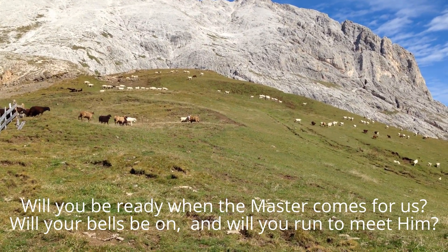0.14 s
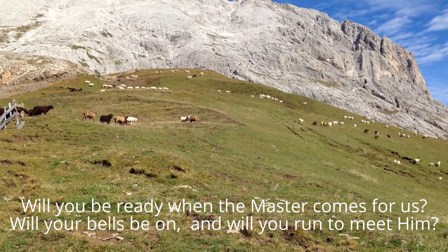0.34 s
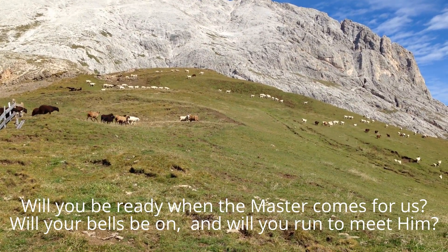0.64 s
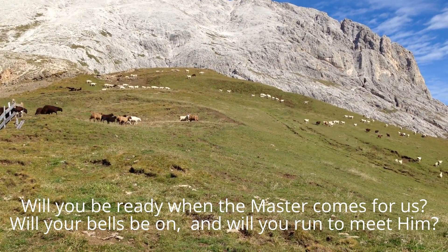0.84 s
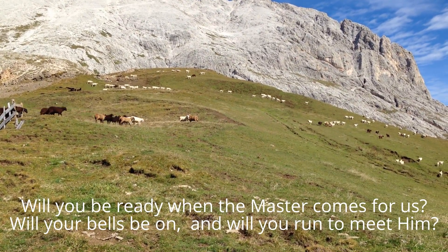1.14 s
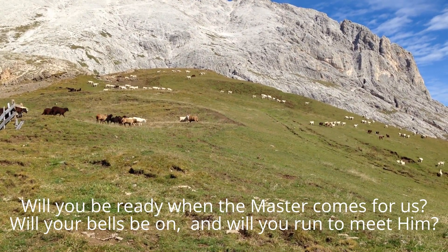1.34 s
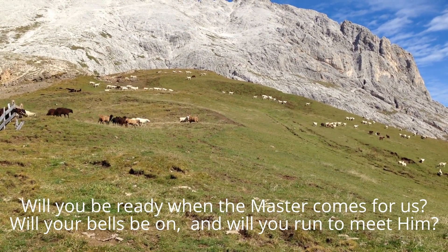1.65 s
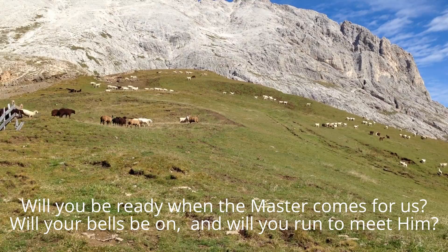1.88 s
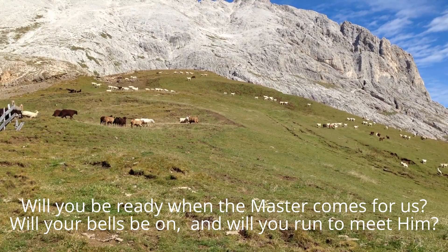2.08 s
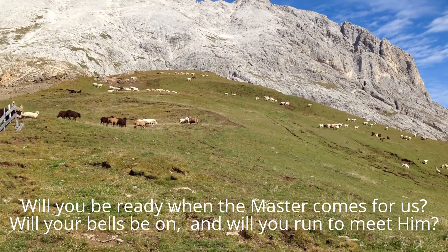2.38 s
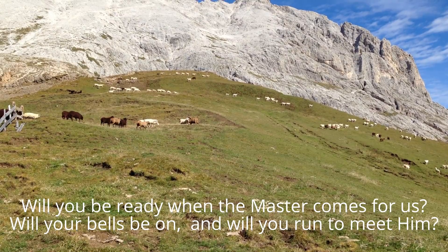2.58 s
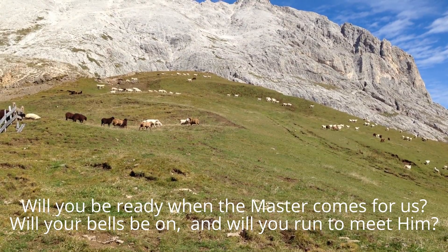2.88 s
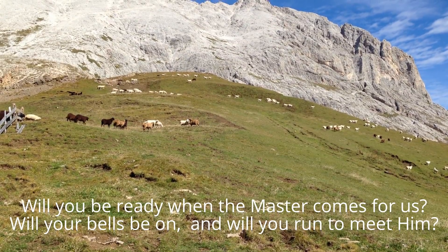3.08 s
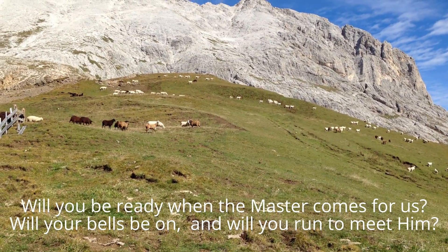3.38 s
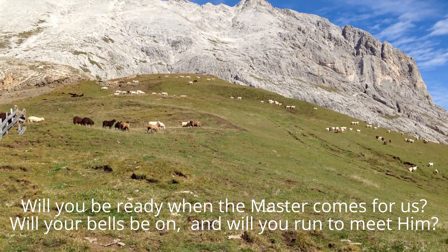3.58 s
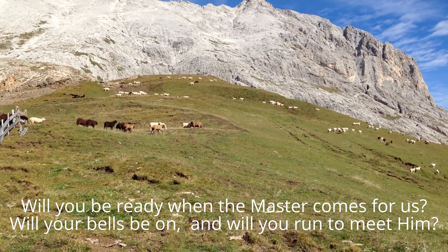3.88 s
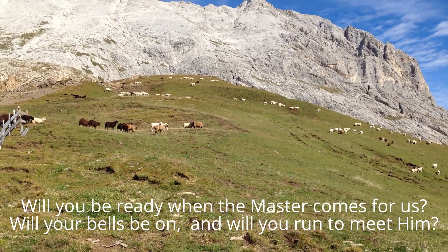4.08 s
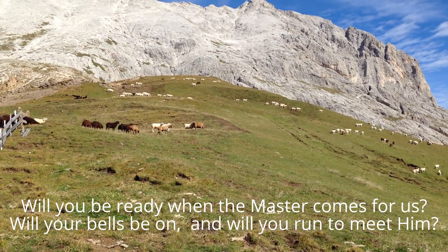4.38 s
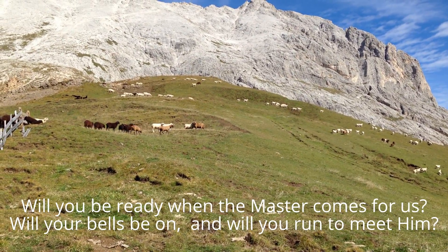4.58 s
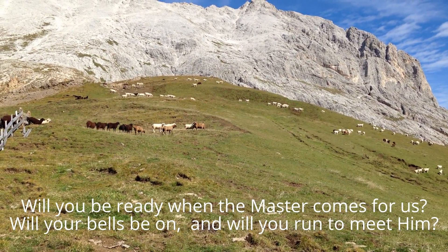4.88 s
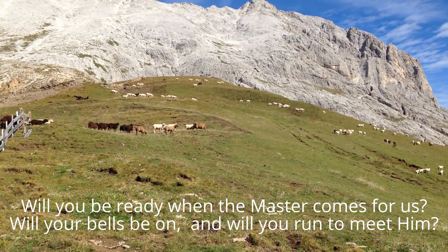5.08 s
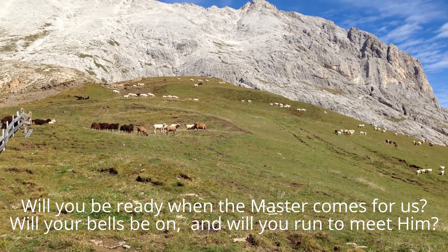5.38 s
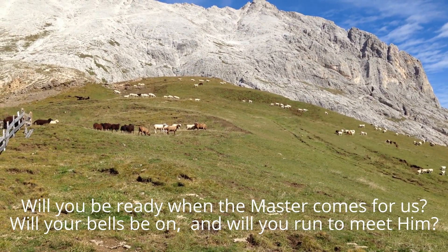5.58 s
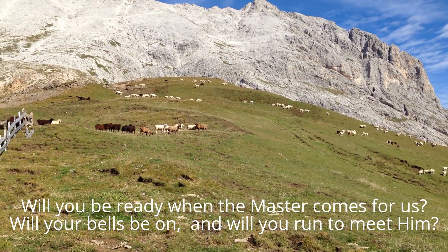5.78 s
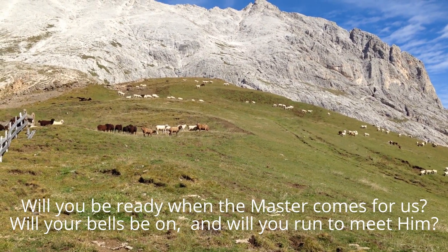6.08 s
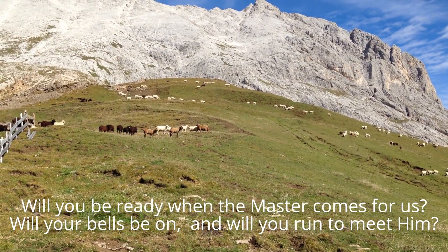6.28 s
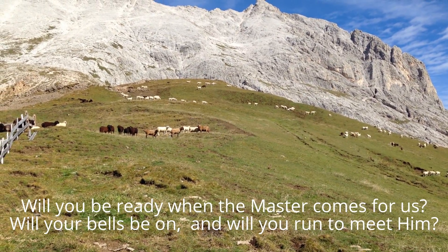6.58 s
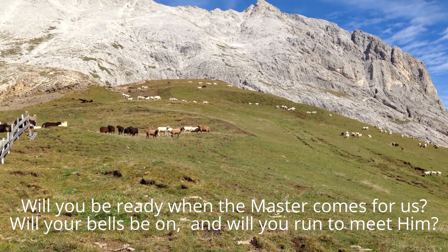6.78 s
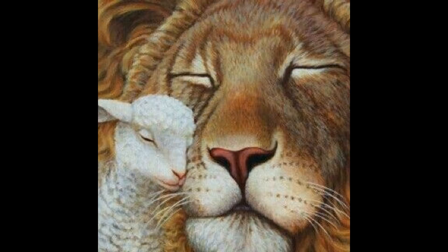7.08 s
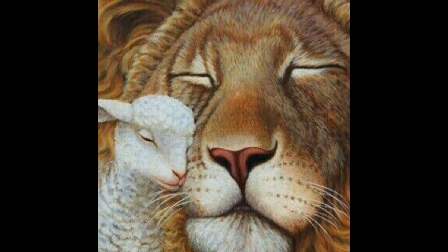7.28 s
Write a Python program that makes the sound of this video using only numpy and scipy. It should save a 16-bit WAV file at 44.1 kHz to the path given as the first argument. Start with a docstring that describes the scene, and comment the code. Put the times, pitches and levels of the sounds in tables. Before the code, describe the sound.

Irregular bell clanks come thick and busy at first, then sparser, with bright ticks from the clappers and a thin sustained bronze shimmer. Distant bells dot the open, echo-free hillside. After a calm start, wind thuds and flutters low against the single microphone, strongest past four seconds. Brief grassy rustles and a barely audible bleat pass over steady hiss; the ending is sudden.

```python
"""Grazing flock on a windy pasture

Neck bells on a mountain pasture: close by, a bronze bell that rings long and three tin bells that clank, each a set
of decaying modes given new levels by blows and soft changes; dying tones and dull clanks stand for bells further off.
Wind buffets the microphone as lumpy low noise with short pops, something near rustles in bursts of mid noise,
dry ticks are specks of noise, and one far animal bleats faintly in harmonics over a steady hiss.
The sound stops short just before seven seconds."""
import sys
import numpy as np
from scipy import signal
from scipy.fft import rfft, irfft
from scipy.io import wavfile
from scipy.ndimage import uniform_filter1d

SR = 44100
rng = np.random.default_rng(int(sys.argv[2]) if len(sys.argv) > 2 else 0)


def unload_audio(sound):
    """Save the sound as a 16-bit wav file, at the path given as the first command line argument."""
    columns = np.transpose(np.atleast_2d(sound))
    # keep every value between -1 and 1, then stretch to whole-number steps
    steps = np.round(np.clip(columns, -1, 1) * 32767)
    wavfile.write(sys.argv[1], SR, steps.astype(np.int16))


N = 328545
T = np.arange(N) / SR
END_S, BAND_LIMIT_HZ = 6.9587, 15450

# Modes of the four near bells, in families that a blow excites together, lowest family first.
# Each row: frequency in Hz, level in dB within the family, time to fall 60 dB in seconds.
BRONZE_MODES = [
    [(1828, 0, 2.5)],
    [(1853, 0, 2.5)],
    [(4553, 0, 1.1)],
    [(7344, 0, .6), (7356, -12, .5)],
    [(7885, -2, .3), (7838, -6, .25), (8870, -4, .45), (10824, -2, .3), (13722, -12, .15), (15030, -5, .15)],
]
TIN_LOW_MODES = [
    [(1041, 0, .27), (1060, -11, .12), (1019, -15, .14), (905, -20, .15)],
    [(2593, -1, .6), (2550, -11, .25), (2625, -14, .25)],
    [(3552, 0, .8)],
    [(3942, 0, .9), (1902, -6, 1.1)],
    [(5078, -4, .3), (5313, -3, .25), (5590, -7, .2), (6470, -11, .1), (6870, -10, .12), (7550, -12, .1),
     (8205, -10, .12), (8780, -9, .15), (9400, -13, .1), (10110, -11, .12), (12090, -13, .1)],
]
TIN_MID_MODES = [
    [(1122, -1, .11), (1165, -12, .1), (1075, -13, .08)],
    [(2795, 0, .65)],
    [(2201, 0, 1.2)],
    [(4047, 0, .9)],
    [(5862, -5, .12), (6358, -2, .08), (6150, -7, .08), (8060, -9, .1), (8672, -9, .1)],
]
TIN_HIGH_MODES = [
    [(1207, 0, .12)],
    [(3582, 0, .15)],
]

# Blows on the bronze bell and, between them, soft changes in the level of its ring.
# Each row: start in seconds, strength in dB, ring and treble in dB (shared out by the family law),
# hum in dB, direction from 0 to 1 across the hum pair (the two lowest modes).
BRONZE_BLOWS = [(.004, -54, -10, -7, -64.5, 0.04), (.099, -51, -12, -12.5, -66.5, 0),
                (.229, -50.5, -12, -16.5, -68, 0), (.502, -46.5, -17.5, -8.5, -82.5, 1),
                (.569, -44.5, -8, -19.5, -72, 0.85), (.699, -52.5, -4.5, -14, -69.5, 0.4),
                (.849, -54, -4.5, -14, -70.5, 0.2), (1.099, -54, -11, -28, -70, 0.6),
                (1.253, -56.5, -4.5, -5, -71, 1), (1.329, -54.5, -6, -14, -71.5, 0.9),
                (1.623, -59, -1.5, -3, -76, 0.2), (1.756, -58.5, 1, -20.5, -77, .8),
                (2.2036, -40, -9, -16, -77.5, 0.8), (2.452, -73, 1, 14.5, -94, 0.5),
                (3.058, -55, -12, -10, -75, .6), (3.169, -48, -23, -22, -64.5, .95),
                (3.349, -58.5, -12, -14, -66.5, 0.93), (3.499, -57.5, -29, -40, -68, 0.15),
                (3.959, -64.5, -10, -4, -70, 1), (4.106, -58.5, 4, -5.5, -64.5, 1),
                (4.319, -58, -4, -5.5, -64.5, 0.7), (4.349, -52, -19, -22, -60.5, 0.2),
                (4.601, -53.5, -15, -30, -62, 0.35), (4.779, -58, -21, -27, -64, .55),
                (5.082, -47, -5.5, -12, -67.5, 0.6), (5.322, -60.5, 2.5, -21, -69.5, 0.4),
                (5.433, -67, 10, 6.5, -60.5, 0.83), (5.748, -66.5, -21, -21.5, -62, 0.2),
                (6.298, -55, -7, -28, -68.5, 0.6), (6.449, -58.5, -20.5, -26.5, -72.5, 0.9),
                (6.599, -56, -6.5, -15, -78.5, .2)]
# Blows on the low tin bell. Each row: start in seconds, strength in dB, ring, upper ring and treble in dB
# (shared out by the family law), factor on the ring time of the lowest family, which the wool damps.
TIN_LOW_BLOWS = [(0.0034, -44.5, -9, -29, -15, 0.45), (0.082, -55.5, -2, -16, -9, 0.47),
                 (0.1563, -45, -0.5, -35, -13, 1), (0.1844, -53, -7, -20, -2, 0.87),
                 (0.2229, -49.5, -13, -25.5, -13.5, 0.52), (0.2534, -56, 7, -32.5, -24.5, 0.42),
                 (0.2673, -38.5, -19.5, -31, -17.5, 0.42), (0.3945, -53, -30, -18, -17, 0.74),
                 (0.5084, -53, -0.5, -18, -11.5, 1), (0.5984, -62, -14, -24.5, -5, 1),
                 (0.6689, -64, -7, -17.5, 9, 0.97), (0.711, -47, -13, -35, -12, 1),
                 (0.7405, -33.5, -31, -43, -45, 0.43), (0.7926, -53.5, -14, -23, -6, 1),
                 (0.8325, -40, -6.5, -18, -24.5, 1), (0.8644, -40.5, -11, -41, -13.5, 0.67),
                 (0.9144, -77, -6, 7, 14, 0.55), (0.9443, -52, -11, -31, -13, 0.98),
                 (1.1495, -43.5, -22, -12.5, -17.5, 0.66), (1.4643, -47, 5, -22, -19, 0.57),
                 (1.5194, -58, -20, -11.5, 4.5, 0.98), (1.7472, -43, -12, -30, -18, 0.62),
                 (1.8666, -45, -12, -36, -21.5, 0.87), (2.3171, -45.5, -8.5, -61, -10, 0.49),
                 (2.518, -46.5, -30, -37, -30, 0.29), (2.6314, -59.5, -12, -14, -20, 0.6),
                 (3.0458, -57.5, -6, -5, -14, 0.57), (3.1577, -65, -13, -10, -13, 0.7),
                 (3.533, -48, -8, -20.5, -31, 0.96), (3.8162, -63, -1, -8, -19, 1),
                 (4.0347, -60, -0.5, -21, -12, 1), (4.2218, -55.5, -22.5, -1.5, -20, 0.27),
                 (4.907, -40.5, -26, -39, -27, 0.35), (5.6291, -63, -15, -27, -13, 0.75),
                 (5.6885, -58, -23, -21, -15, 0.25), (5.8696, -58.5, -11, -18, -15, 0.44),
                 (5.9244, -47.5, -15, -17.5, -21, 1), (6.1175, -56.5, -3, -23.5, -14, 0.48),
                 (6.2924, -54.5, -7.5, -13, -24, 0.27), (6.4017, -52.5, -17.5, -27.5, -11, 0.63),
                 (6.4157, -38, -27.5, -29, -31, 0.55), (6.4298, -28, -16.5, -46, -32.5, 0.31),
                 (6.4985, -50, -5, -22, -29, 0.34), (6.586, -56, -10, -8.5, -10, 0.58),
                 (6.6213, -51, -23, -23, -21, 0.35), (6.8728, -52, -2.5, -0.5, -3.5, 0.62)]
# Blows on the middle tin bell. Each row: start in seconds, strength in dB, ring, upper ring and treble in dB.
TIN_MID_BLOWS = [(0.222, -54.5, -23, -8, -13), (1.0584, -70.5, -16, 15, 5), (1.43, -53, -7, -30.5, -5),
                 (1.479, -57, -18, 1, -3), (2.0674, -44.5, -21, -24.5, -26), (2.1605, -63.5, -6, -12, -15),
                 (2.2593, -59.5, -12.5, -7.5, -9), (2.3356, -64.5, -16, 2, -8), (2.499, -48, -20, -20, -27),
                 (2.6758, -64, -13.5, -8, -11), (2.8907, -52.5, -18.5, -12, -18),
                 (2.9991, -65.5, -17, -7, -16), (3.1445, -64, -15, -3, -1), (3.3094, -57.5, -18, -16, -11),
                 (3.515, -61.5, -9, -11, -1), (3.753, -61.5, -16, -3.5, -5.5), (4.0494, -82, -4, -10, -10),
                 (4.2158, -60, -26, -17.5, -12), (4.7384, -59, -19, -11, -17), (4.8838, -48, -25, -26, -13),
                 (4.928, -56.5, -30, 2.5, -7.5), (5.079, -45, -16, -19, -21),
                 (5.3053, -54.5, -9.5, -7, -6.5), (5.3874, -59, -24, -5, -11), (5.7514, -62, -9, -36, -9),
                 (5.921, -52.5, -21, -15.5, -24), (6.4133, -46, -29, -25.5, -29), (6.696, -67, -12, -3, 0)]
# Blows on the high tin bell. Each row: start in seconds, strength in dB, ring in dB.
TIN_HIGH_BLOWS = [(.1196, -66.5, 9), (0.4746, -52, 6), (1.7534, -56, -0.5), (3.0894, -70, 10),
                  (4.6478, -83, 16), (5.473, -73.5, 13.5)]

# How a blow feeds the families above the hum pair. Each row: dB over the strength, share of ring, of treble.
BRONZE_LAW = [(0, 0, 0), (0, 1, 0), (0, 0, 1)]
# The same for every family of the low and middle tin bells.
# Each row: dB over the strength, share of ring, of upper ring, of treble.
TIN_LOW_LAW = [(3.5, 0.045, 0.22, 0), (-1, 0.95, 0.13, 0.056), (-0.5, 0.28, 0.88, 0.078),
               (-6, 0.061, 0.58, 0.29), (-3, 0.028, 0.12, 0.92)]
TIN_MID_LAW = [(8, 0.25, 0, 0), (4, 0.75, 0.051, 0.21), (-1.5, .5, 0.33, 0.3), (-1, 0.16, 0.78, 0.015),
               (-2.5, 0.067, 0, 0.76)]
# The same for the high tin bell. Each row: dB over the strength, share of ring.
TIN_HIGH_LAW = [(0, 0), (0, 1)]

# Moments when the 4553 Hz tone of the bronze bell dips to silence, as close tones beating.
# Each row: time in seconds, half width in seconds.
BEAT_DIPS = [(.05, 0.0035), (.2, 0.021), (.56, 0.051), (1.06, 0.01), (1.28, 0.02), (1.54, 0.015),
             (3.3, 0.13), (4.57, 0.028), (4.76, 0.043), (6.62, 0.0085)]
# Spectrum of the glitter after a blow. Each row: frequency in Hz, density in dB per Hz.
GLITTER_SPECTRUM = [(3000, -42.5), (5000, -16), (7000, -2), (10000, -21), (14000, -22.5), (16000, -31.5)]
# Bells further off, of which one tone carries. Each row: start in seconds, starting rms in dB, pitch in Hz.
FAR_TONES = [(.56, -70, 1480), (.69, -64, 1500), (.71, -60, 8200), (1.08, -66, 1100), (1.31, -62.5, 830),
             (1.33, -69, 1500), (1.62, -61, 4939), (1.76, -59, 4850), (1.77, -63, 10110), (4.75, -69, 3050),
             (4.885, -52, 4470), (5.2, -58.5, 1040), (5.69, -65, 4850), (5.865, -67, 6100),
             (5.865, -65, 8800), (6.428, -55, 4200), (6.43, -60, 10100), (6.43, -62, 6150)]

# Wind between the pops, before its overall trim and its lumps. Each row: time in seconds, level in dB.
WIND_LEVEL = [(0, -69), (.3, -71), (.75, -70), (1.3, -70), (2.15, -65.5), (2.4, -57), (2.58, -64.5),
              (2.8, -44.5), (3.08, -58), (3.3, -51), (3.75, -47), (4.2, -49.5), (4.55, -46.5), (5.1, -44.5),
              (5.5, -48), (5.68, -44.5), (5.76, -64), (5.86, -44.5), (6.2, -44.5), (6.45, -44),
              (6.57, -51.5), (6.66, -46.5), (6.95, -34.5)]
# Spectrum of the buffeting. Each row: frequency in Hz, density in dB per Hz.
BUFFET_SPECTRUM = [(15, -75.5), (25, -46), (49, -30), (138, 4), (211, 1.5), (330, -12), (376, -12),
                   (468, -21.5), (723, -32), (800, -34), (1040, -74), (1760, -120)]
# Pops of wind on the microphone. Each row: crest in seconds, level in dB, centre in Hz.
WIND_POPS = [(.431, -46, 211), (0.455, -28.5, 260), (0.561, -53.5, 187), (0.688, -54, 168),
             (0.911, -55, 190), (1.158, -51, 176), (1.411, -56, 187), (1.55, -47, 190), (1.949, -50, 193),
             (2.242, -46, 192), (2.458, -46.5, 181), (2.632, -40.5, 193), (2.756, -36.5, 167),
             (2.779, -41.5, 176), (2.806, -26.5, 270), (2.84, -37.5, 240), (2.89, -32.5, 194),
             (2.961, -43.5, 190), (3.187, -34, 178), (3.246, -35.5, 196), (3.273, -38, 173),
             (3.429, -34, 182), (3.453, -51, 171), (3.584, -28.5, 190), (3.602, -28.5, 162),
             (3.859, -39.5, 171), (3.993, -32.5, 161), (4.135, -41, 196), (4.237, -39.5, 189),
             (4.304, -22.5, 203), (4.334, -14, 277), (4.361, -27.5, 265), (4.703, -31.5, 268),
             (4.723, -14.5, 217), (4.771, -27.5, 294), (4.792, -22.5, 270), (4.807, -26, 295),
             (4.823, -49, 222), (4.87, -29, 220), (4.927, -27.5, 330), (5.019, -32.5, 188),
             (5.139, -31, 258), (5.276, -45, 214), (5.334, -16.5, 241), (5.353, -27, 227),
             (5.448, -33, 258), (5.542, -25, 238), (5.589, -29.5, 197), (5.611, -34, 248),
             (5.697, -25, 151), (5.885, -37, 208), (5.931, -37, 203), (5.958, -59, 211), (5.974, -30, 216),
             (5.986, -22, 218), (6.007, -31.5, 177), (6.03, -28.5, 204), (6.057, -28.5, 170),
             (6.116, -50, 176), (6.287, -38.5, 200), (6.303, -37, 182), (6.35, -34.5, 162),
             (6.438, -39, 206), (6.493, -37.5, 235), (6.702, -38, 270), (6.733, -29, 234),
             (6.751, -22, 242), (6.858, -48, 174), (6.869, -32, 227), (6.897, -41, 217),
             (6.936, -28.5, 235)]

# Near rustles. Each row: start in seconds, level in dB, relative level of the treble part in dB, before trims.
RUSTLE_BURSTS = [(0.284, -48, -21.5), (.315, -37, -11.5), (.326, -38, -12.5), (0.348, -49, -26),
                 (1.424, -50.5, -11), (1.563, -35, -20.5), (1.589, -48, -33), (1.711, -52, -57),
                 (1.887, -41.5, -37), (1.911, -47.5, -36), (1.948, -49, -11), (1.957, -38, -9),
                 (1.984, -42.5, -31), (2.009, -55.5, -28.5), (2.030, -49, -8), (2.083, -38, -21.5),
                 (2.102, -43.5, -14), (2.227, -61, -21.5), (2.646, -54, -18), (4.241, -50, -20.5),
                 (4.458, -37, -32), (4.494, -40.5, -20), (4.604, -42.5, -10), (4.715, -46.5, -25),
                 (4.795, -42.5, -10), (4.809, -38.5, -18), (5.016, -54, -30), (5.331, -51, -35),
                 (6.222, -58.5, -5)]
# Spectrum behind the dull and bright parts of a rustle. Each row: frequency in Hz, density in dB per Hz.
RUSTLE_SPECTRUM = [(250, -53), (400, -40), (600, -2.5), (950, -7), (1500, -6), (2200, -16), (3600, -22.5),
                   (4500, -46.5), (7000, -77)]
# Dry ticks, many of them with a clapper blow. Each row: start in seconds, level in dB before a trim.
DRY_TICKS = [(0.1536, -53), (0.2528, -53), (0.5028, -53), (1.149, -61), (1.4313, -54), (2.2049, -53),
             (3.1862, -60), (4.104, -55), (4.3206, -50.5), (4.8808, -54), (5.0799, -53), (5.3218, -52),
             (5.434, -59), (5.4554, -53), (5.9559, -65), (6.4285, -51), (6.5844, -59)]

# The far bleat. Each row: time in seconds, pitch in Hz, rms of one partial in dB ahead of throat and flutter.
BLEAT_COURSE = [(2.221, 229.4, -75), (2.299, 228, -91), (2.41, 211.7, -84), (2.461, 231, -86),
                (2.56, 230, -88), (2.68, 224, -93), (2.8, 232, -79)]
# Throat of the far animal. Each row: frequency in Hz, gain in dB.
THROAT_GAIN = [(200, -41.5), (690, 11), (1100, -36), (1600, 4), (2300, -3.5), (2900, -15.5)]
# Spectrum of the steady hiss. Each row: frequency in Hz, density in dB per Hz.
HISS_SPECTRUM = [(180, -47.5), (300, -7), (766, -10.5), (1050, -2.5), (1340, -12), (1860, -10.5),
                 (2380, -9.5), (4310, -10.5), (4530, -2), (4840, -12), (15300, -14.5)]


def amp(db):
    """Amplitude factor of a level in dB."""
    return 10 ** (np.asarray(db) / 20)


def evened(x):
    """The signal scaled to rms 1."""
    return x / np.sqrt(np.mean(x ** 2) + 1e-20)


def read(points, hz):
    """Read a spectrum table at any frequency, in straight lines over log frequency."""
    f, value = np.transpose(points)
    return np.interp(np.log(hz + 1), np.log(f + 1), value)


def coloured(points, size):
    """Noise of rms 1 with the given spectrum."""
    hz = np.fft.rfftfreq(size, 1 / SR)
    spectrum = rfft(rng.standard_normal(size)) * amp(read(points, hz))
    return evened(irfft(spectrum, size))


def wander(hz):
    """Slow random drift of rms 1: noise low-passed at hz."""
    low_pass = signal.butter(2, hz, fs=SR, output="sos")
    return evened(signal.sosfilt(low_pass, rng.standard_normal(N)))


def add(mix, s, sound):
    """Lay a sound into the mix from s seconds on, cut at the end of the mix."""
    part = mix[round(s * SR):][:len(sound)]
    part += sound[:len(part)]


def flock():
    """The four near bells, each from its table of blows, and those further off."""
    big, low, mid, high = map(np.array, (BRONZE_BLOWS, TIN_LOW_BLOWS, TIN_MID_BLOWS, TIN_HIGH_BLOWS))
    # the direction splits the power of each row over the hum pair
    side = np.clip(big[:, -1:], .01, .99)
    hum_db = big[:, -2:-1] + 10 * np.log10(np.hstack([1 - side, side]))
    bronze_hits = np.hstack([hum_db, blow_levels(big, BRONZE_LAW)])
    bronze = ring_on(BRONZE_MODES, big[:, 0], bronze_hits, keep_db=-15)
    tin_low = ring_on(TIN_LOW_MODES, low[:, 0], blow_levels(low, TIN_LOW_LAW), keep_db=-13.5)
    tin_mid = ring_on(TIN_MID_MODES, mid[:, 0], blow_levels(mid, TIN_MID_LAW), keep_db=-13.5)
    tin_high = ring_on(TIN_HIGH_MODES, high[:, 0], blow_levels(high, TIN_HIGH_LAW), keep_db=-13.5)
    return (bell(BRONZE_MODES, bronze, tick_db=-13, soft_db=-51.0, jangle_db=-18.5, waver_db=0.3,
                 beat_dips=BEAT_DIPS)
            + bell(TIN_LOW_MODES, tin_low, tick_db=-0.5, soft_db=-75.0, jangle_db=-1.5, waver_db=5.0,
                   length=low[:, -1])
            + bell(TIN_MID_MODES, tin_mid, tick_db=-2.5, soft_db=-84.0, jangle_db=-1.0, waver_db=3.5)
            + bell(TIN_HIGH_MODES, tin_high, tick_db=-22, soft_db=-63, jangle_db=-19.0, waver_db=1.5)
            + far_bells())


def blow_levels(rows, law):
    """What each row puts into each family: its strength, plus the family's shares of the next columns."""
    law = np.array(law)
    strength_db = rows[:, 1:2]
    colour_db = rows[:, 2:law.shape[1] + 1]
    return strength_db + law[:, 0] + colour_db @ law[:, 1:].T


def ring_on(families, s, hit_db, keep_db):
    """Rows (s, tick dB, family dB ..): each new level adds to what is left of the ring before."""
    t60 = np.array([family[0][-1] for family in families])
    ring_db = hit_db.copy()
    for i in range(1, len(s)):
        left_db = ring_db[i - 1] - 60 * (s[i] - s[i - 1]) / t60 + keep_db
        ring_db[i] = 10 * np.log10(amp(2 * hit_db[i]) + amp(2 * left_db))  # powers add
    return np.column_stack([s, hit_db[:, -1], ring_db])


def bell(families, blows, tick_db, soft_db, jangle_db, waver_db, beat_dips=(), length=1):
    """Each blow or soft change trades the old ring for a new level; the swinging bell makes the ring waver."""
    last = np.searchsorted(blows[:, 0], T) - 1
    before = np.maximum(last - 1, 0)
    # 9 s of decay stands for silence where there has been no blow yet
    since = np.where(last < 0, 9, T - blows[last, 0])
    older = np.where(last < 1, 9, T - blows[before, 0])
    # rows too soft to lift the top family above soft_db change the ring gently; a hard blow takes 0.53 ms
    rise_s = np.minimum(0.00053 * (1 + amp(2 * (soft_db - blows[last, -1]))), .035)
    heard = T + 7e-4 * np.cumsum(wander(9.1)) / SR  # the swing shifts every pitch a little
    struck = np.interp(blows[:, 0], T, heard)
    ring = np.zeros(N)
    for k, family in enumerate(families):
        depth_db = waver_db * (.35 if k == 0 else 1)
        swing = amp(depth_db * np.clip(wander(7.8), -2, 2))
        turn = rng.random()
        if k == 2:
            for s, width in beat_dips:
                swing = swing * np.tanh((T - s) / width)  # fades through zero and returns inverted
        # every row shares its level out anew, which shuffles the crowded upper modes most
        chance = np.clip(rng.standard_normal((len(blows), len(family))), -2, 1.2)
        share_db = .4 * (len(family) - 1) * chance
        for j, (hz, db, t60) in enumerate(family):
            start_db = blows[:, 2 + k] + db + share_db[:, j]
            fall_db = 60 / (t60 * (length if k == 0 else 1)) * np.ones(len(blows))  # dB per second
            lead = (family[0][0] - hz) * struck + turn  # the modes of a family start in step
            old_share = np.exp(-since / (rise_s + 1.4 / hz))  # low modes need a few cycles more
            new_level = amp(start_db[last] - fall_db[last] * since)
            new = new_level * np.sin(2 * np.pi * (hz * heard + lead[last]))
            old_level = amp(start_db[before] - fall_db[before] * older)
            old = old_level * np.sin(2 * np.pi * (hz * heard + lead[before]))
            ring += np.sqrt(2) * swing * ((1 - old_share) * new + old_share * old)
    # a tick at each row: bright noise that falls 60 dB in 13 ms
    tick = amp(blows[last, 1] + tick_db - 60 * since / 0.013) * np.diff(rng.standard_normal(N + 1))
    # countless short high modes blur into a glitter that falls 60 dB in 0.3 s
    jangle = amp(blows[last, -1] + jangle_db - 60 * since / .3 + 2.0 * wander(110)) * glitter()
    return ring + tick + jangle


def glitter(count=70):
    """Many crowded high modes, as noise heaped into narrow bands at scattered pitches."""
    hz = np.fft.rfftfreq(N, 1 / SR)
    heaps = np.zeros(len(hz))
    heaps[np.searchsorted(hz, rng.uniform(4200, 14500, count))] = amp(6.7 * rng.standard_normal(count))
    heaps = signal.oaconvolve(heaps, np.hanning(600), "same") + 0.074  # a thin floor between the bands
    return evened(irfft(rfft(coloured(GLITTER_SPECTRUM, N)) * heaps, N))


def far_bells(count=190, clanks=60):
    """Distant bells as single dying tones: the clearer in place, the faintest and dull clanks scattered."""
    out, t = np.zeros(N), np.arange(SR // 2) / SR
    u, v = rng.random((count, 4)), rng.random((clanks, 3))
    # tones as (s, starting rms dB, Hz, t60 s)
    clear = [(*row, 0.16) for row in FAR_TONES]
    faint = np.transpose([END_S * u[:, 0], -76 + 8.0 * (u[:, 1] - .5), 850 * 11 ** u[:, 2], .1 + .3 * u[:, 3]])
    dull = [(END_S * a, -70 + 10 * (b - .5), 1100 + 260 * (c - .5), .12) for a, b, c in v]
    for s, db, hz, t60 in [*clear, *faint, *dull]:
        level = np.sqrt(2) * amp(db - 60 * t / t60) * np.minimum(t / 0.00426, 1)
        add(out, s, level * np.sin(2 * np.pi * hz * t))
    return out


def wind():
    """Lumpy low noise; eddies that burst on the membrane give pops of a cycle or two."""
    trim_db, swell_db, swell_s = -6.0, -16, 0.016  # the wind swells around each pop and falls by 1/e in swell_s
    level = amp(np.interp(T, *np.transpose(WIND_LEVEL)) + trim_db)
    for s, db, hz in WIND_POPS:
        level += amp(db + swell_db) * np.exp(-abs(T - s) / swell_s)
    out = level * amp(3.76 * wander(7.7)) * coloured(BUFFET_SPECTRUM, N)
    t = np.arange(-1500, 1500) / SR
    for (s, db, hz), turn in zip(WIND_POPS, rng.random(len(WIND_POPS))):
        span = 1.205 / (2 * hz)  # half width, from a length in cycles
        sharp = amp(0.18 * (db + 19.0) - 10.5) * np.exp(-(1.7 * t / span) ** 2)  # strong pops are brighter
        overtone = sharp * np.cos(2 * np.pi * (2.06 * hz * t + 3 * turn))
        wave = np.cos(2 * np.pi * (hz * t + turn)) + overtone
        add(out, s + t[0], amp(db) * wave * np.exp(-(t / span) ** 2))
    bass_cut = signal.butter(3, 70., "high", fs=SR, output="sos")  # the microphone's bass cut
    return signal.sosfilt(bass_cut, out)


def rustles():
    """Short crackly bursts of mid noise near by, each with its own brightness; the treble dies first."""
    t60, rise_s = .12, 0.00336
    out, t = np.zeros(N), np.arange(8192) / SR
    # two parts of one spectrum, sloping off 25 dB per octave over two octaves
    bright = [(hz, level - 25 * np.clip(np.log2(1500 / hz), 0, 2)) for hz, level in RUSTLE_SPECTRUM]
    dull = [(hz, level - 25 * np.clip(np.log2(hz / 1200), 0, 2)) for hz, level in RUSTLE_SPECTRUM]
    fall_db = -60 * np.maximum(t - rise_s, 0) / t60
    for s, db, treble_db in RUSTLE_BURSTS:
        grain = amp(3.3 * evened(uniform_filter1d(rng.standard_normal(len(t)), size=70)))  # the crackle
        treble = amp(treble_db + 6.0 + .5 * fall_db)
        noise = coloured(dull, len(t)) + treble * coloured(bright, len(t))
        add(out, s, np.minimum(t / rise_s, 1) * amp(db - 1.5 + fall_db) * grain * noise)
    return out


def ticks():
    """Dry specks of wide noise, each falling 60 dB in 7.4 ms and cut just before."""
    out, t = np.zeros(N), np.arange(300) / SR
    for s, db in DRY_TICKS:
        add(out, s, amp(db + 6.0 - 60 * t / 0.0074) * rng.standard_normal(len(t)))
    return out


def bleat():
    """One far animal: slightly unsteady harmonics through a fixed throat."""
    s, hz, db = np.transpose(BLEAT_COURSE)
    pitch = np.interp(T, s, hz) * (1 + 0.02 * wander(40))
    turns = np.cumsum(pitch) / SR
    voice = sum(amp(read(THROAT_GAIN, k * pitch)) * np.cos(2 * np.pi * k * turns) for k in range(1, 13))
    flutter_db = 4 * wander(45)
    return np.sqrt(2) * voice * amp(np.interp(T, s, db, -120, -120) + flutter_db)


def hiss():
    """Steady coloured noise under everything, at -65.5 dB rms."""
    return amp(-65.5) * coloured(HISS_SPECTRUM, N)


def scene():
    """The flock in front, then wind, rustles, ticks, the far bleat and the hiss, in one channel."""
    return (flock() + wind() + rustles() + ticks() + bleat() + hiss())[None]


def record(dry):
    """The sound ends abruptly, and a steep low-pass limits the band."""
    low_pass = signal.firwin(301, BAND_LIMIT_HZ, window=("kaiser", 9), fs=SR)
    return signal.oaconvolve(dry * (T < END_S), low_pass[None], "same")


dry = scene()
out = record(dry)
unload_audio(out)
```